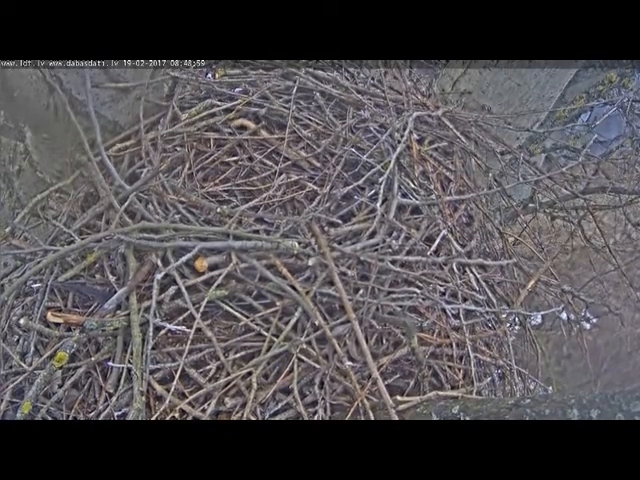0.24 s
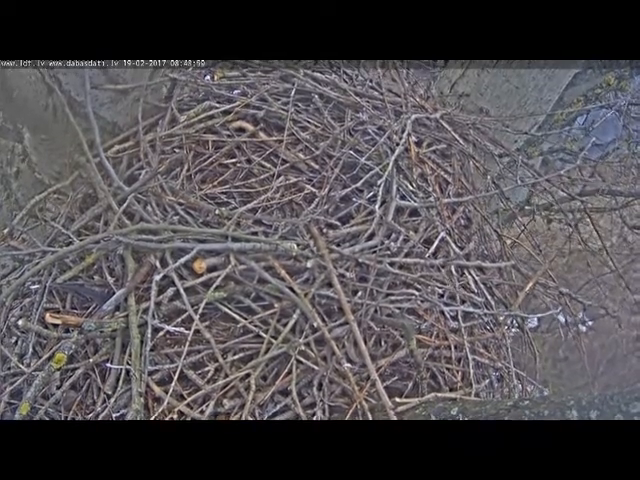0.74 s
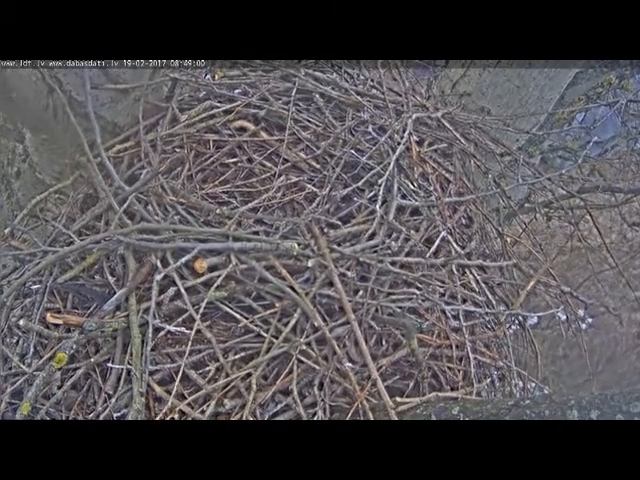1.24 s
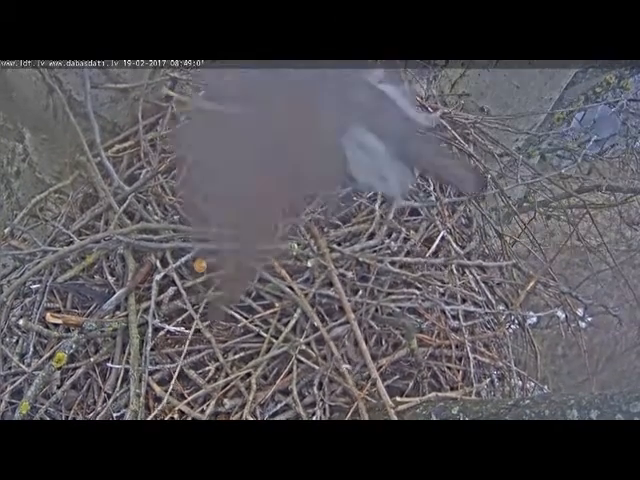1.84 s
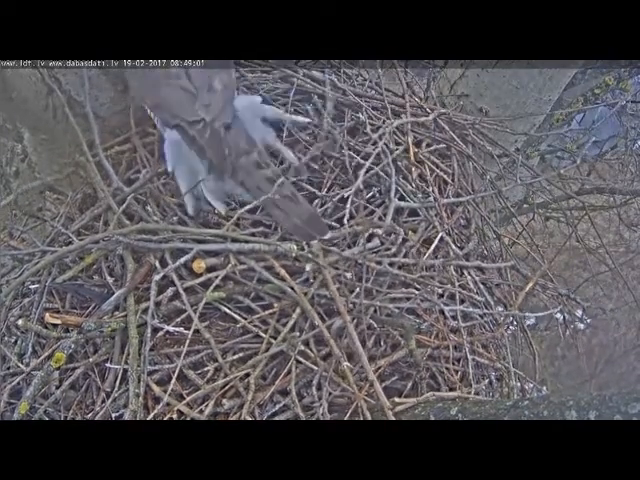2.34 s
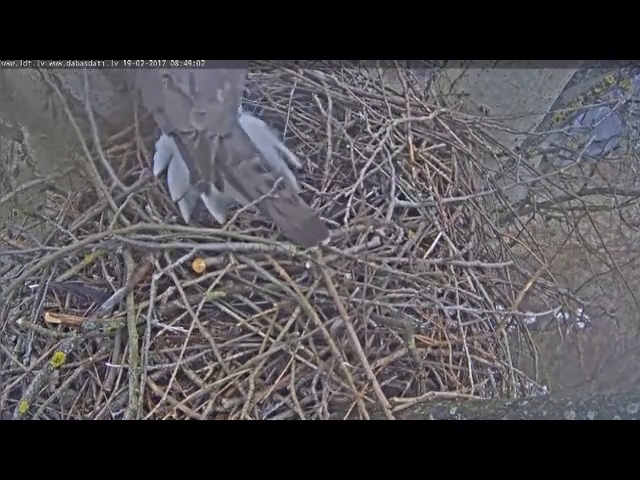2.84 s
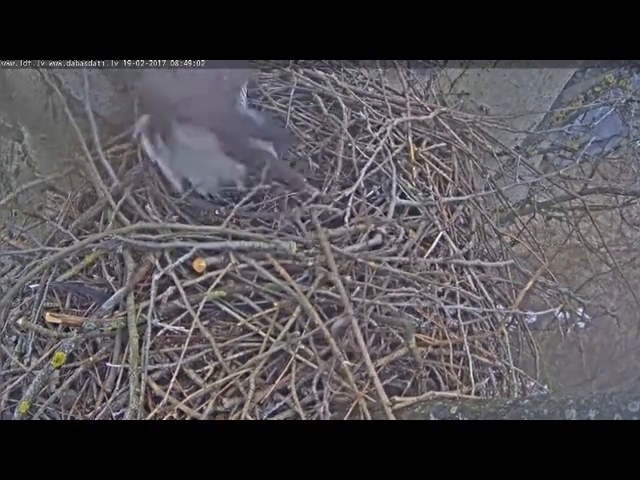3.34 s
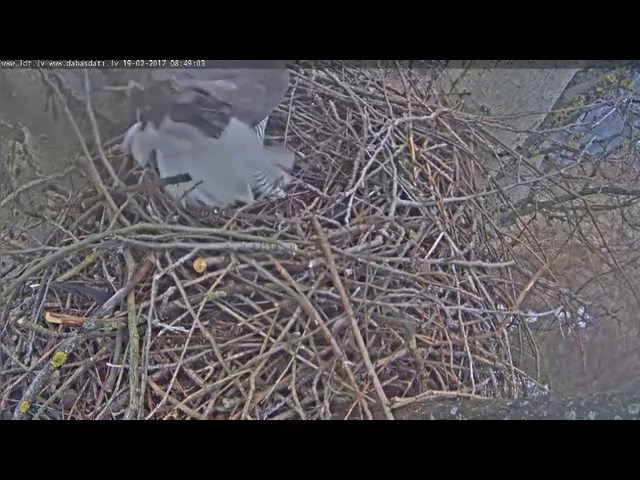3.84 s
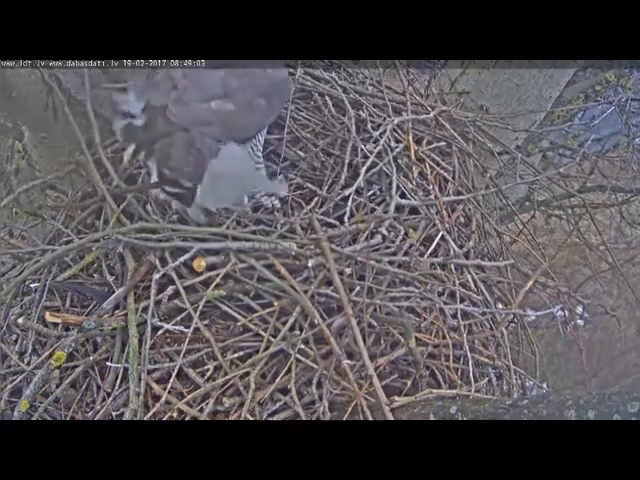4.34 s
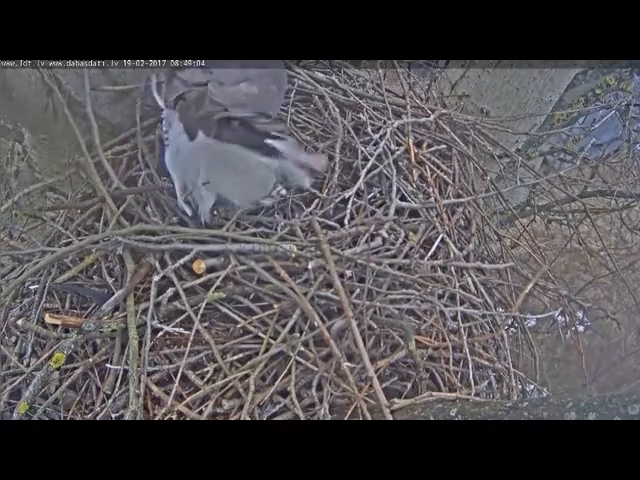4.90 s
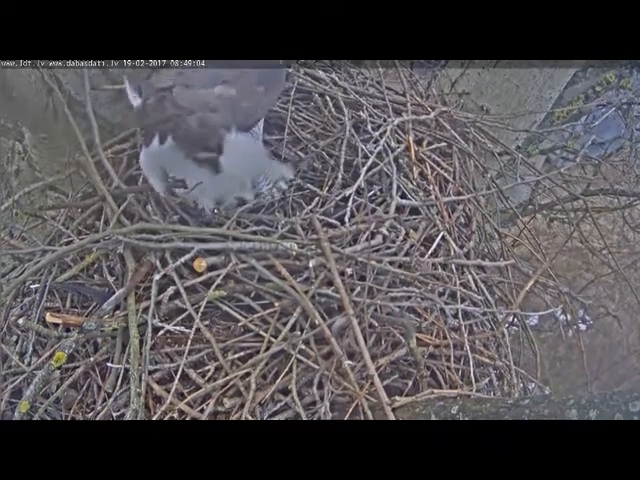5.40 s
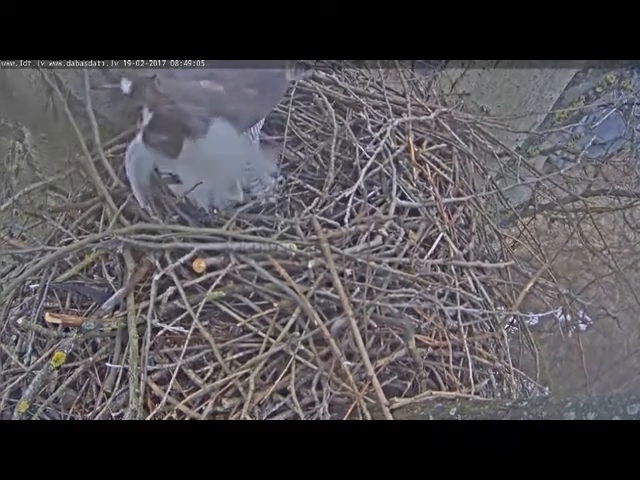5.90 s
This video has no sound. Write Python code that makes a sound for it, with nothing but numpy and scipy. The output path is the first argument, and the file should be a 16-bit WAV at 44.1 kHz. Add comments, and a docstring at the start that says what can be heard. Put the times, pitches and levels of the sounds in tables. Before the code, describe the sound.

Wind thumps the microphone, far dogs bark, twigs tick, then a hawk gives a fast, even run of sharp kek calls close by.

```python
"""Wind noise buffets and thumps one microphone throughout, over a distant hum. A faint wavering whistle
comes first, then far dogs: three rough gliding partials per bark, blurred by echoes, again near the end.
Twigs tick (noise puffs) as a goshawk lands on its stick nest in a tree; short grainy bursts of broad
noise come then and later. It gives a run of quick kek calls close by: partials of a third of the pitch
creak, then only the harmonics ring on and fall, with added noise and echoes off branches and wood."""
import sys
import numpy as np
from scipy import signal
from scipy.fft import rfft, irfft, next_fast_len
from scipy.io import wavfile

SR = 44100
rng = np.random.default_rng(int(sys.argv[2]) if len(sys.argv) > 2 else 0)


def store_wav(level_fs):
    """Save 16-bit WAV to argv[1]."""
    pcm = np.round(np.clip(np.atleast_2d(level_fs), -1, 1) * 32767)
    wavfile.write(sys.argv[1], SR, pcm.T.astype(np.int16))


N = 271656


def amp(db):
    """Decibels to gain."""
    return 10 ** (np.asarray(db) / 20)


def rms_one(x):
    """Scale to unit rms."""
    return x / np.sqrt(np.mean(x ** 2) + 1e-20)


def in_time(rows):
    """Columns of a (time_s, ...) table, interpolated at every sample."""
    time_s, *columns = np.transpose(rows)
    return [np.interp(np.arange(N) / SR, time_s, column) for column in columns]


def at_hz(points, hz):
    """Read a (hz, db) spectrum on a log-frequency axis."""
    point_hz, point_db = np.transpose(points)
    return np.interp(np.log(hz), np.log(point_hz), point_db)


def coloured(spectrum, size=N, gain=1.):
    """Noise of the given spectrum, rms 1 at gain 1; gain acts before the colour, so the colour stays."""
    pad = 4096
    gain = np.pad(gain * np.ones(size), pad, mode="edge")
    fft_size = next_fast_len(len(gain))
    bin_hz = np.maximum(np.fft.rfftfreq(fft_size, 1 / SR), 1)
    colour = amp(at_hz(spectrum, bin_hz))
    white = rng.standard_normal(len(gain)) * gain
    noise = irfft(rfft(white, fft_size) * colour, fft_size)
    return noise[pad:pad + size] / np.sqrt(np.mean(colour ** 2))


def drift(rate_hz, size=N):
    """Slow random curve of rms 1: white noise through two equal one-pole low-passes."""
    r = np.exp(-2 * np.pi * rate_hz / SR)
    run_in = SR // 2
    slow = signal.lfilter([1], [1, -2 * r, r * r], rng.standard_normal(size + run_in))
    return rms_one(slow[run_in:])


def add(out, start_s, sound):
    """Mix a sound in at start_s."""
    i = round(start_s * SR)
    out[i:i + len(sound)] += sound[:N - i]


def scatter(x, delay_s, t60_s, top_hz):
    """Dense echoes: low-passed noise dying away, of unit energy."""
    t = np.arange(SR) / SR
    tail = rng.standard_normal(SR) * amp(-60 * t / t60_s) * (t > delay_s)
    tail = signal.lfilter(*signal.butter(1, min(top_hz, .4 * SR), fs=SR), tail)
    return signal.fftconvolve(x, tail / np.sqrt(np.sum(tail ** 2)))[:N]


# hum spectrum: hz, density_db (dB per Hz, relative)
HUM_SPECTRUM = [(30, -11), (60, 1), (150, -19), (280, -23), (450, -30.5), (700, -32), (1200, -34.5),
                (1600, -41.5), (2200, -48.5), (11000, -55), (12400, -67)]
HUM_DB = -40  # rms


def hum():
    """Distant hum: steady noise, strongest at low frequencies."""
    return amp(HUM_DB) * coloured(HUM_SPECTRUM)


# wind strength on the microphone, before random drift: time_s, buffet_db, sway_db
WIND_STRENGTH = [(0, -22, -39), (.2, -18, -31), (.58, -17, -27.5), (.66, -21.5, -28), (.86, -22.5, -22.5),
                 (.99, -14.5, -30), (1.05, -29, -24.5), (1.24, -14.5, -25.5), (1.44, -27, -26.5),
                 (1.94, -27, -27.5), (2.1, -12, -23), (2.27, -15, -25.5), (2.5, -8.5, -21),
                 (2.7, -23, -29.5), (3.15, -28.5, -21.5), (3.24, -36.5, -28.5), (3.7, -37.5, -23.5),
                 (5.08, -41, -30.5), (5.2, -18, -21), (5.7, -27.5, -26), (5.95, -34.5, -32.5),
                 (6.16, -43.5, -30.5)]
# buffeting spectrum: hz, density_db (dB per Hz, relative)
BUFFET_SPECTRUM = [(25, -3.5), (45, -5.5), (60, 0), (120, -8.5), (185, -8.5), (215, -14), (250, -31.5),
                   (340, -28.5), (480, -35), (700, -42.5), (1300, -51.5), (2500, -84)]
# deep sway spectrum: hz, density_db (dB per Hz, relative)
SWAY_SPECTRUM = [(8, 3), (15, 16.5), (32, 14.5), (50, 2), (90, -30), (200, -55)]
# single eddies in the lull: start_s, top_db (rms)
EDDY_THUMPS = [(2.81, -20), (3.14, -25.5), (3.341, -28.5), (3.488, -28), (4.191, -30), (4.99, -32)]
THUMP_HALF_WIDTH_S = 0.012  # to 1/e


def wind():
    """Eddies hit the microphone in lumps, a few stand alone as thumps; the slower sway lies under them."""
    buffet_db, sway_db = in_time(WIND_STRENGTH)
    t = np.arange(N) / SR
    thumps = np.zeros(N)
    for start_s, top_db in EDDY_THUMPS:
        z = (t - start_s - THUMP_HALF_WIDTH_S) / THUMP_HALF_WIDTH_S
        thumps += amp(top_db) * np.exp(-z ** 2)
    buffet_gain = amp(buffet_db + 1.09 * drift(12) + 2.53 * drift(22))
    lumps = coloured(BUFFET_SPECTRUM, gain=buffet_gain + thumps)
    sway = coloured(SWAY_SPECTRUM, gain=amp(sway_db + 1.38 * drift(14)))
    return lumps + sway


WHISTLE_START_S, WHISTLE_LENGTH_S, WHISTLE_DB = 0.85, .47, -75
WHISTLE_HZ, WHISTLE_WAVER = 4400, 0.0057  # waver: rms share of pitch


def small_bird():
    """Faint far whistle: a sine with randomly wavering pitch."""
    t = np.arange(round(WHISTLE_LENGTH_S * SR)) / SR
    hz = WHISTLE_HZ * (1 + WHISTLE_WAVER * drift(10, len(t)))
    swell = np.sin(np.pi * t / t[-1]) ** .5
    out = np.zeros(N)
    add(out, WHISTLE_START_S, amp(WHISTLE_DB) * swell * np.sin(np.cumsum(2 * np.pi * hz / SR)))
    return out


# far barks of two dogs: start_s, length_s, pitch_hz, start_pitch_ratio, level_db,
# second_db (second partial re first)
FAR_BARKS = [(1.105, 0.043, 580, 0.99, -40, -10), (1.121, 0.082, 504.7, 0.81, -46, 14.5),
             (1.176, 0.046, 537, 1.01, -40, -17), (1.372, .034, 521, 1.01, -37, -10),
             (1.391, 0.052, 450.6, 0.88, -51.5, 19), (1.416, 0.072, 496.6, 1.07, -31.5, -11),
             (1.608, 0.1206, 445.5, 0.76, -58, 16), (1.639, 0.099, 451.4, 0.99, -35, -22),
             (4.855, 0.08, 469, .94, -49, 14.5), (4.882, 0.073, 509, 1.03, -30.5, -10),
             (5.061, 0.034, 369, .97, -56.5, 25), (5.079, 0.083, 502, 1.04, -31, -10),
             (5.33, 0.087, 476, 1.03, -38, -4.5)]
BARK_THIRD_DB, BARK_ROUGH = -13, 0.39  # third partial re second; roughness 0-1
FAR_DELAY_S, FAR_T60_S, FAR_TOP_HZ, FAR_WET_DB = 0.054, 0.3, 1300, -18
HOARSE_SPECTRUM = [(300, -13.0), (600, 4), (1000, 1.0), (1500, -5.5), (2500, -34)]  # hz, density_db


def dogs():
    """Three partials gliding quickly onto pitch, roughened, with hoarse noise, blurred by echoes."""
    out = np.zeros(N)
    for start_s, length_s, pitch_hz, start_ratio, level_db, second_db in FAR_BARKS:
        z = np.linspace(0, 1, round(length_s * SR))
        glide = 1 + (start_ratio - 1) * (1 - z) ** 3
        hz = pitch_hz * glide * (1 + 0.06 * BARK_ROUGH * drift(59, len(z)))
        phase = np.cumsum(2 * np.pi * hz / SR)
        tone = np.zeros(len(z))
        for k, partial_db in enumerate((0, second_db, second_db + BARK_THIRD_DB), 1):
            rough = 1 + BARK_ROUGH * drift(71, len(z))
            tone += amp(partial_db) * rough * np.sin(k * phase)
        hoarse_gain = amp(max(0, second_db) - 9.5) * BARK_ROUGH
        hoarse = hoarse_gain * coloured(HOARSE_SPECTRUM, len(z))
        swell = np.sin(np.pi * z ** 0.96) ** 0.49
        add(out, start_s, amp(level_db) * (tone + hoarse) * swell)
    return out + amp(FAR_WET_DB) * scatter(out, FAR_DELAY_S, FAR_T60_S, FAR_TOP_HZ)


# twigs and feet: start_s, peak_db, band_hz (band runs from band_hz / 1.4 to 2 band_hz)
TWIG_TICKS = [(1.9, -43, 10450), (1.971, -45, 4500), (1.997, -39, 10000), (2.024, -44, 6000),
              (2.03, -34.5, 2800), (2.066, -44.5, 1800), (2.11, -38.5, 8540), (2.302, -35, 600),
              (3.369, -42, 5000)]
TICK_T60_S = 0.021


def twigs():
    """Twigs tick under the landing bird as short band-passed noise puffs."""
    out, t = np.zeros(N), np.arange(600) / SR
    for start_s, peak_db, hz in TWIG_TICKS:
        band = signal.butter(2, [hz / 1.4, min(hz * 2.0, .4 * SR)], "band", fs=SR)
        puff = rng.standard_normal(len(t)) * amp(-60 * t / TICK_T60_S)
        tick = signal.lfilter(*band, puff)
        add(out, start_s, amp(peak_db) * tick / np.abs(tick).max())
    return out


# short bursts of broad noise, before random drift: peak_s, peak_db, rise_s, fall_s
NOISE_BURSTS = [(2.04, -50, .12, 0.11), (2.7, -43.5, 0.049, 0.085), (3.37, -49, 0.049, 0.09),
                (5.14, -33.5, .06, 0.085)]
BURST_EDGE_DB = -10  # level re peak at the ends of rise and fall
BURST_SPECTRUM = [(500, -3), (1500, -3.0), (4000, -13.0), (9500, -16.5), (12300, -7.0)]  # hz, density_db


def noise_bursts():
    """Short grainy bursts of broad noise: bell-shaped swells with a fast random level."""
    now = np.arange(N) / SR
    bursts = np.zeros(N)
    for peak_s, peak_db, rise_s, fall_s in NOISE_BURSTS:
        z = np.where(now < peak_s, (peak_s - now) / rise_s, (now - peak_s) / fall_s)
        bursts += amp(peak_db + BURST_EDGE_DB * z ** 2)
    return coloured(BURST_SPECTRUM, gain=bursts * amp(0.88 * drift(120)))


# throat and beak resonance on the harmonics: hz, gain_db
THROAT_RESONANCE = [(400, 3.5), (800, 20), (1200, 11.5), (1700, 7), (2300, -2), (3000, -6.5), (3700, -8.5),
                    (4700, -31), (5700, -13.5), (6600, -35), (7500, -23.5), (8400, -37), (10200, -30),
                    (12000, -31.5)]
# partials between the harmonics, heard in the creak: hz, gain_db
CREAK_RESONANCE = [(400, -7), (830, -16), (1650, -4), (2050, -5), (2900, -8.5), (4000, -34), (7000, -30.5),
                   (12000, -39.5)]
# spectrum of the noise in each call: hz, density_db (dB per Hz, relative)
CALL_NOISE_SPECTRUM = [(300, -23.5), (1000, 1.5), (2300, 3.5), (4000, -1.5), (7000, -5), (10500, -9.5),
                       (12500, -10.5)]
CREAK_DB, ONSET_DB, FLICKER_DB = -11.5, 0.32, 4.5  # creak re onset; onset re middle; flicker per octave
NOISE_DB, NOISE_TAIL_S = -16.5, 0.018
JITTER, CREAK_JITTER = 0.011, 0.042  # rms share of pitch
SAG, SAG_PER_DB = 0.092, .045  # final pitch drop, deeper in a call that fades


def kek(voiced_s, hz0, hz1, hz2, db1, fade_db, creak_s, treble_db, first_db, third_db):
    """Partials of a third of the pitch; the two in three between the harmonics sound only in the creak."""
    t = np.arange(round((creak_s + voiced_s + 0.094) * SR)) / SR
    z = (t - creak_s) / voiced_s  # 0-1 over the voiced part
    end_s = creak_s + voiced_s
    db0, db2 = db1 + ONSET_DB, db1 - fade_db

    hz = np.polyval(np.polyfit([0, .5, 1], [hz0, hz1, hz2], 2), np.clip(z, 0, 1.1))
    jitter = np.where(z < 0, CREAK_JITTER, JITTER) * drift(350, len(t))
    hz *= 1 + 0.108 * np.minimum(z, 0) + jitter  # the creak scoops up to pitch
    hz *= 1 - (SAG + SAG_PER_DB * fade_db) * np.clip(z - .85, 0, .3)  # sags as the pressure fails

    k = np.arange(1, 37)[:, None]
    partial_hz = k * hz / 3
    is_harmonic = k % 3 == 0
    in_creak = np.clip((creak_s + 0.0025 - t) / 0.0041, 0, 1)
    high_oct = np.clip(np.log2(partial_hz / 2800), 0, 2)  # above the main resonance
    # the beak opens during the creak, freeing the upper partials
    shut_db = -4.5 * np.clip(1 - t / creak_s, 0, 1) * np.log2(np.maximum(k / 3, 1))
    flicker_db = FLICKER_DB * np.array([drift(90, len(t)) for _ in range(6)])[k[:, 0] % 6]

    colour_db = np.where(is_harmonic, at_hz(THROAT_RESONANCE, partial_hz), at_hz(CREAK_RESONANCE, partial_hz))
    voiced = (z > 0) & (z < 1)
    first, second, third = 2, 5, 8  # rows of the first three harmonics
    for row, relative_db in ((first, first_db), (third, third_db)):
        colour_db[row] += relative_db - np.mean((colour_db[row] - colour_db[second])[voiced])
    slope_db = treble_db + 10.0 - 5 * np.clip(z, 0, 1)  # per octave; treble tires along the call
    high_db = slope_db * np.maximum(high_oct - .5, 0)

    gains = amp(colour_db + high_db + shut_db) * np.where(is_harmonic, 1, in_creak)
    gains /= np.sqrt(np.sum(gains ** 2, axis=0) / 2)
    # upper partials and the creak are unsteady
    gains *= amp(flicker_db * np.maximum(high_oct + 0.017, .6 * in_creak))
    phase = k * np.cumsum(2 * np.pi * hz / 3 / SR) + rng.normal(0, 1.0, k.shape)

    times_s = [0, .003, creak_s - .003, creak_s + 0.061 * voiced_s, creak_s + .5 * voiced_s,
               creak_s + 1.006 * voiced_s, end_s, end_s + 0.0068, t[-1]]
    levels_db = [db0 - 13.5, db0 + CREAK_DB + 2, db0 + CREAK_DB, db0, db1,
                 db2, db2 - 3, db2 - 32.0, -120]
    tone = amp(np.interp(t, times_s, levels_db)) * np.sum(gains * np.cos(phase), axis=0)

    # noise swells with the creak and lingers briefly after the tone
    noise_times_s = [0, creak_s, end_s, end_s + NOISE_TAIL_S, t[-1]]
    swell_db = np.interp(t, noise_times_s, [db0 - 8.5, db0, db1 - 5.0, db1 - 14, db1 - 39.5])
    noise_db = swell_db + NOISE_DB + 0.35 * (treble_db + 13)
    noise = coloured(CALL_NOISE_SPECTRUM, len(t), amp(noise_db))
    return tone * np.minimum(t / 0.0047, 1) + noise * np.minimum(t / creak_s, 1)


# kek calls: start_s, voiced_s, start_hz, middle_hz, end_hz (before jitter and sag),
# level_db (at the middle), fade_db (middle to end)
KEK_CALLS = [(2.341, 0.014, 1006, 928, 832, -24.5, -3), (2.504, 0.018, 1138, 1056, 926, -22, -1.5),
             (2.691, 0.028, 1183, 1039, 963, -19.5, 4.5), (2.878, .024, 1164, 1035, 974, -18, 4),
             (3.057, 0.027, 1140, 1059, 996, -17, 0), (3.229, 0.028, 1183, 1073, 988, -17, 0),
             (3.395, 0.04, 1193, 1087, 992, -16.5, 3), (3.563, 0.038, 1215, 1142, 944, -15, 3.5),
             (3.74, .032, 1234, 1162, 946, -16, 3), (3.908, 0.036, 1246, 1100, 930, -17.5, 3.5),
             (4.093, 0.03, 1288, 1143, 1001, -16, 1.5), (4.259, .034, 1231, 1157, 967, -14.5, 2),
             (4.427, 0.036, 1264, 1144, 931, -15, 2), (4.605, 0.041, 1264, 1127, 972, -13.5, 8.5),
             (4.781, 0.048, 1290, 1139, 875, -12.5, 15.5), (4.962, 0.041, 1273, 1197, 998, -12, 10.5),
             (5.134, 0.041, 1231, 1178, 944, -13.5, 10.5), (5.313, .04, 1279, 1165, 976, -14, 6.5),
             (5.491, 0.039, 1276, 1162, 975, -16, 9.5), (5.674, .044, 1276, 1164, 935, -18, 8)]
# voice along the run, as the bird warms up and turns its head: time_s, creak_s,
# treble_db (per octave before a fixed +10), first_db, third_db (harmonics re second, before treble)
VOICE_RUN = [(2.34, 0.02, -26.5, -0.5, -16.5), (2.7, .016, -16, -3.5, -17.5), (3.06, .013, -10, -2, -13.5),
             (3.45, 0.014, -14.5, -3.5, -13), (3.9, 0.012, -31.5, -2, -24.5), (4.15, .012, -17, -3, -12),
             (4.429, 0.014, -13, -3.5, -26.5), (4.6, .012, -9, -3.5, -10.5), (4.96, .012, -4, -4, -8),
             (5.301, .013, -10, -4.5, -11), (5.68, 0.013, -15.5, 0, -6.5)]
# echoes off branches and wood: delay_s, t60_s, level_db, top_hz
WOOD_ECHOES = [(.003, 0.131, -21, 9150), (0.025, 0.704, -42, 3350)]


def hawk():
    """All calls, with what the tree and the wood throw back."""
    out = np.zeros(N)
    run_s, *voice = np.transpose(VOICE_RUN)
    for start_s, *call in KEK_CALLS:
        voice_now = [np.interp(start_s, run_s, column) for column in voice]
        add(out, start_s, kek(*call, *voice_now))
    echoes = np.zeros(N)
    for delay_s, t60_s, level_db, top_hz in WOOD_ECHOES:
        echoes += amp(level_db) * scatter(out, delay_s, t60_s, top_hz)
    return out + echoes


def scene():
    """One microphone feeds both channels."""
    mono = hum() + wind() + small_bird() + dogs() + twigs() + noise_bursts() + hawk()
    return np.stack([mono, mono])


OVERLOAD, OFFSET, STOP_HZ = .9, .0035, 12600  # full scale = 1; stop-band edge


def record(dry):
    """Rounds the highest peaks, adds a small steady offset and cuts the top."""
    run_in = 500  # samples, lets the filter settle
    rounded = OVERLOAD * np.tanh(dry / OVERLOAD) + OFFSET
    padded = np.pad(rounded, [(0, 0), (run_in, 0)], mode="edge")
    low_pass = signal.cheby2(12, 70, STOP_HZ, fs=SR, output="sos")
    return signal.sosfilt(low_pass, padded)[:, run_in:]


dry = scene()
out = record(dry)
store_wav(out)
```